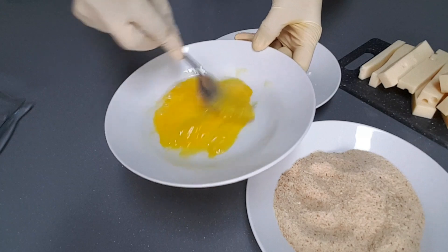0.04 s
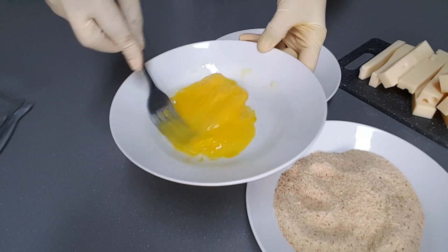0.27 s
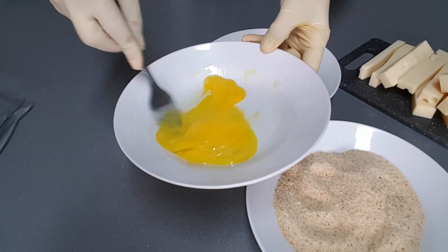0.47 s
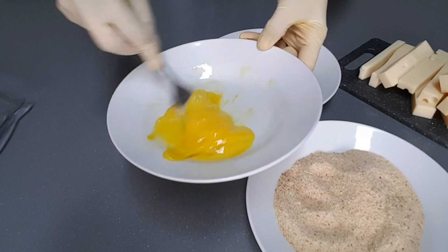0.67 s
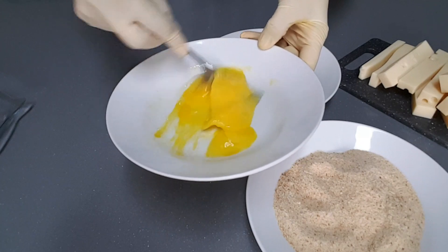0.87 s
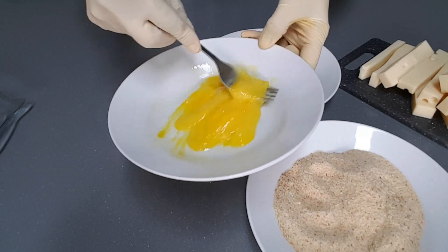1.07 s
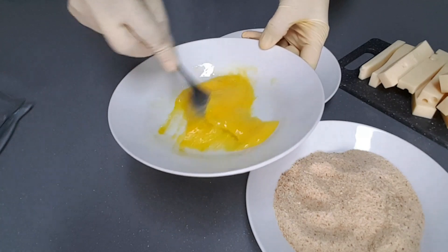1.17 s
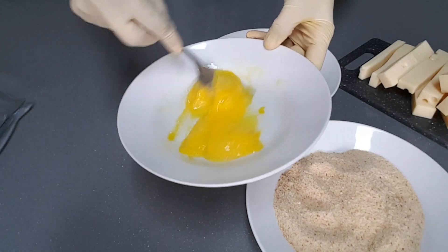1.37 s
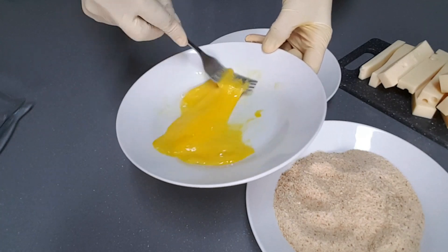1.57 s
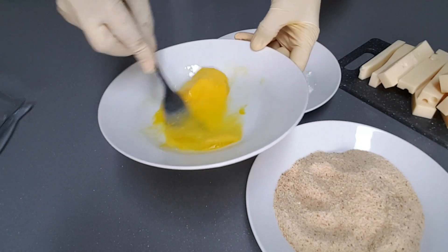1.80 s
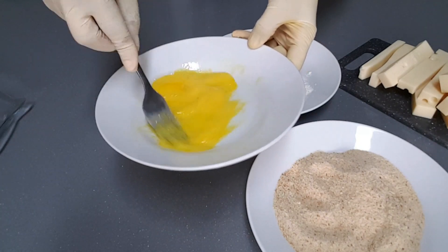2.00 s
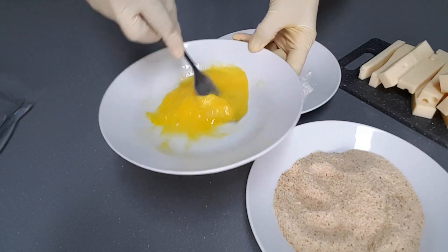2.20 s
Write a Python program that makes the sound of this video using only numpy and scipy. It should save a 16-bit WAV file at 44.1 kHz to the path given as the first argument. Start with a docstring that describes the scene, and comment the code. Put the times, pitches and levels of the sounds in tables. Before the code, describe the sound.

A metal fork beats raw egg in a hand-held ceramic plate for just over two seconds, about six strokes each second. Soft wet swishes, tiny bubbles and plops fill between sharp, uneven tine ticks, strong near 0.39 and 0.57. Bright short-ringing clinks hit at 0.64, 0.76 and 1.84. Faint low handling thuds and steady hiss lie beneath; close stereo pickup, small kitchen reflections.

```python
"""A faint wet swish opens over room hiss, then a steel fork beats a raw egg in a hand-held ceramic plate,
about six strokes a second, in a small kitchen. Drags are grainy, patchy noise; bubbles and plops are
rising damped tones. Tines tick as short coloured bursts; a few blows on bare ceramic add ringing modes.
A low murmur and dull jolts come from the plate in the hand; a decaying noise tail is the room."""
import sys
import numpy as np
from scipy import signal
from scipy.fft import rfft, irfft, next_fast_len
from scipy.io import wavfile
from scipy.ndimage import uniform_filter1d

SR = 44100
rng = np.random.default_rng(int(sys.argv[2]) if len(sys.argv) > 2 else 0)


def transcribe(u):
    """Save the signal u as a 16-bit wav file named by the first command-line argument.

    u: samples, shape (n,) or (channels, n), limited to [-1, 1]; the rate is SR.
    q: integer samples, one column per channel.
    """
    v = np.clip(np.atleast_2d(u).T, -1, 1)
    q = np.round(v * 32767).astype(np.int16)
    wavfile.write(sys.argv[1], SR, q)


N = 99225

# Steady room hiss: colour [f/Hz, level/dB]
HISS_COLOUR = [(25, -56), (60, -68), (140, -59.5), (300, -70.5), (600, -69.5), (1500, -62), (3000, -61.5),
               (5000, -67.5), (8400, -92), (10000, -81), (14000, -90)]
HISS_DB = -59

# Low murmur of the held plate: level over time [t/s, level/dB]
MURMUR_LEVEL = [(0, -71), (.08, -59), (.2, -68.5), (.32, -61), (.56, -60), (0.702, -63), (1.2, -68.5),
                (1.8, -65.5), (2.0, -82), (2.25, -71.5)]
# Murmur colour [f/Hz, level/dB]
MURMUR_COLOUR = [(30, -16), (80, -3), (140, 5.5), (210, -2.5), (310, 5), (450, -9), (900, -12), (3000, -61)]

# Fork dragging through egg [middle t/s, half length/s, level/dB]
SWISHES = [(.005, 0.023, -54), (0.086, 0.036, -48.5), (0.249, 0.024, -45.5), (0.294, 0.0062, -44.5),
           (0.446, 0.026, -41.5), (0.619, 0.04, -45.5), (0.795, .03, -52), (0.974, 0.038, -40.5),
           (1.158, 0.025, -41), (1.328, 0.022, -38.5), (1.483, 0.026, -39.5), (1.645, 0.031, -47),
           (1.821, 0.019, -45.5), (1.984, 0.063, -41.5), (2.17, 0.022, -41)]
# Colour of the egg's swish [f/Hz, level/dB]
SWISH_COLOUR = [(100, -20), (300, -15.5), (700, -30), (1400, 3), (2600, -0.5), (4200, -3), (6500, -0.5),
                (8400, 4), (9600, -6), (12500, -1), (14400, -8), (16000, -3)]
GRAIN_DEPTH_DB, GRAINS_PER_S = 3, 500
PATCH_DEPTH_DB = 4

# Tiny bubbles: middle level before a doubling in amplitude, middle pitch, pitch range either way as a natural
# log
BUBBLE_DB, BUBBLE_HZ, BUBBLE_LOG_RANGE = -48, 1837, 0.7
BUBBLE_COUNT, BUBBLE_T60_S = 260, 0.009
POCKET_ATTACK_S, PITCH_RISE_PER_S = 0.0011, 3.3  # shared by bubbles and plops

# Room decay by pitch [f/Hz, t60/s]
ROOM_DECAY = [(150, 0.1), (600, 0.84), (2000, 0.51), (6000, 0.79), (14000, 0.39)]
# Room colour [f/Hz, level/dB]
ROOM_COLOUR = [(100, -3), (350, -1.5), (600, 5.5), (1000, -1.5), (3000, 4), (8000, 1.5), (14000, 3)]
# Left-right likeness of the room [f/Hz, correlation]
ROOM_ALIKE = [(100, -.2), (300, 0.84), (700, 0.58), (1500, 0.22), (3000, 0.13), (6000, -0.031)]
TICK_ROOM_DB, CLINK_ROOM_DB, EGG_ROOM_DB = -7, -3, -5  # sends into the room
EARLY_DB, EARLY_T60_S, ROOM_FADE_IN_S = 12, 0.059, 0.0057

# Tines on the wet plate [t/s, level/dB, bass/dB, treble/dB, low ring/dB, high ring/dB,
# burst-shape t60/s, left over right/dB]
TICKS = [(.0245, -34.5, 11, -2, 0, -13, 0.016, 2), (.0432, -30, 4.5, 1.5, -5, -1, 0.0058, 8),
         (0.2086, -25.5, 3, -0.5, 5, 5.5, 0.013, 3), (0.241, -36, 10, -5, -24, -6, 0.0065, 2),
         (0.3875, -15, -1.5, -6, -12.5, -20, 0.06, 2), (0.4599, -30.5, 5, -1, -5, -7, 0.019, 10),
         (0.567, -16.5, 1.5, 0.5, -12, -4.5, 0.015, -1), (.753, -20, 3.5, -1, -13, -2.5, 0.018, 4),
         (0.8337, -25.5, 10, 3, 3, 1.5, 0.017, 3), (0.9318, -20.5, 9.5, 3, 13.5, 4.5, 0.0065, -1.5),
         (1.0134, -32.5, -26, 4, -12, -4, 0.017, -4), (1.109, -25, 5, 7.5, 1.5, 0.5, 0.019, -0.5),
         (1.1654, -31.5, 5, 3, 0, -10, 0.051, -1), (1.268, -19, 1.5, 4.5, 15.5, -15, 0.02, 0.5),
         (1.3106, -39.5, 19, 8, -5, -2, 0.0037, -1), (1.4346, -23.5, 4, -7, 5.5, 7, 0.011, 5.5),
         (1.5944, -22.5, 5, 3.5, -4, -2.5, 0.025, 3), (1.773, -27.5, 2.5, -0.5, 11, -7.5, 0.0053, -2),
         (1.9524, -17.5, 1, -8.5, -5, -20, 0.0093, -2), (2.054, -26.5, -4, -53, 2.5, 0, 0.016, 3),
         (2.0997, -30, 2, -2.5, 4, -9.5, 0.024, 1), (2.227, -41.5, 13, 3, 8, -4, 0.016, -1)]
# Tick colour [f/Hz, level/dB]
TICK_COLOUR = [(30, -45.5), (200, -14), (750, -30), (1300, -13.5), (1800, -9), (2520, 1.5), (2900, -3.5),
               (3500, -4.5), (4300, -13), (5300, -3.5), (5850, -8.5), (6500, 2.5), (7400, -6), (8350, 12),
               (9300, -14), (9900, -15.5), (10750, -2.5), (11500, -10.5), (12600, 1.5), (14400, -4.5),
               (16000, -19)]
TICK_ATTACK_S, TICK_HOLD_S = 0.0006, 0.0022
PING_HZ, LOW_RING_HZ, HIGH_RING_HZ = 2540, 5180, 8400
PING_DB, PING_WIDTH_HZ, RING_WIDTH_HZ = 5, 150, 380
BASS_HZ, TREBLE_HZ = 2310, 8940  # shelf corners

# Air pockets closing in the egg [t/s, level before a doubling in amplitude/dB, starting f/Hz]
PLOPS = [(0.0444, -34.5, 2220), (0.077, -43, 1254), (.081, -39.5, 1924), (.1615, -47, 3460),
         (0.242, -47, 1470), (.272, -35.5, 1348), (.2745, -38.5, 1700), (.425, -32, 1900), (.43, -41, 855),
         (.462, -38, 1580), (0.5257, -35, 1336), (.549, -41, 1400), (.578, -44, 1880), (.603, -36, 1510),
         (0.841, -26, 2230), (1.166, -44, 1440), (1.182, -35.5, 1277), (1.219, -41.5, 2090),
         (1.243, -39.5, 1516), (1.311, -35.5, 1995), (1.332, -42, 1530), (1.335, -32.5, 1192),
         (1.43, -41.5, 1436), (1.472, -42, 1430), (1.494, -41.5, 1860), (1.6512, -31.5, 1477),
         (1.654, -31.5, 1900), (1.721, -46.5, 1630), (1.731, -47, 1105), (1.7735, -33.5, 1380),
         (1.774, -34, 2120), (2.052, -37.5, 1496), (2.2262, -39, 1850)]
PLOP_T60_S = 0.026
SQUELCH_DB, SQUELCH_T60_S, SQUELCH_OCTAVES = -5, 0.025, 0.22  # wet noise around each plop

# Fork on bare ceramic [t/s, level/dB, bass/dB, treble/dB, ring trim/dB]
CLINKS = [(0.3904, -36, -13, 4, -1.5), (.643, -11.5, 0, 10.5, -7.5), (0.7594, -22.5, -1.5, 8, -9.5),
          (.833, -26.5, 7.5, 1, -6.5), (0.8407, -35.5, -8, -16, -13), (1.8418, -15, 4, 12, -5),
          (1.8499, -31, 3, 29.5, 1)]
# Colour of the crack [f/Hz, level/dB]
CRACK_COLOUR = [(30, -28.5), (130, -1.5), (330, -16.5), (560, -2), (1100, 6), (1700, 6.5), (2500, 2.5),
                (3600, 7), (4800, 1.5), (6800, 6), (8600, 2), (9500, -7.5), (10300, -1.5), (11200, -15.5),
                (12200, -7), (14400, -13.5), (16000, -84)]
# Ringing of plate and fork [f/Hz, level before ring trim/dB, t60/s]
RING_MODES = [(550, -13, .05), (1345, -8, .07), (1715, -4, .07), (1987, -11, .07), (3065, -14, .08),
              (3500, -6, .08), (4150, -6, .08), (5399, -7, .14), (5850, -17, .14), (6753, -10, .13),
              (7505, -12, .22), (8480, -13, .1), (8653, -12, .14), (10200, -16, .12), (12185, -14, .15),
              (14410, -20, .1)]
CRACK_HOLD_S, CRACK_SHAPE_T60_S = 0.00087, 0.029
RING_DB, RING_SCATTER_DB, RING_JITTER_HZ = -1, 1.5, 3
RING_TIME_SPREAD_S = 0.00002  # random left and right offset of each mode

# Jolts of the held plate [t/s, level/dB]
JOLTS = [(0.647, -46), (0.9327, -33), (1.269, -45), (1.4342, -46.5), (1.5944, -44), (1.8427, -36)]
# Jolt colour [f/Hz, level/dB]
JOLT_COLOUR = [(30, -20), (70, -5), (130, -1), (250, -15), (420, 0.5), (700, -6), (1100, -6.5), (2500, -36)]
JOLT_SHAPE_T60_S = 0.012

# Left-right likeness of the direct noises and impacts [f/Hz, correlation]
DIRECT_ALIKE = [(40, 0.79), (90, -0.12), (160, 0.18), (300, -0.019), (600, 0.66), (1500, 0.79),
                (3000, 0.33), (6000, 0.024), (12000, 0.49)]
# Stereo lean of the direct sound [f/Hz, left over right/dB]
STEREO_LEAN = [(150, -2.5), (600, -2.5), (1400, -1.5), (3000, -2), (5200, -7), (7800, -2.5), (9000, 14),
               (10700, 8), (12800, 5.5), (14500, -2.5)]
LEFT_LEAD_S = 0.00003
CEILING, TOP_HZ = 0.9, 14900  # peak limit in full scale, top of the band


def amp(db):
    """Decibels to amplitude."""
    return 10 ** (np.asarray(db) / 20)


def unit(x):
    """Scale to an rms of 1."""
    return x / np.sqrt(np.mean(x ** 2) + 1e-20)


def along(points, hz):
    """Read a curve of (Hz, value) points on a log frequency axis."""
    f, value = np.transpose(points)
    return np.interp(np.log(hz + 1), np.log(f + 1), value)


def seconds(count):
    """Time of each sample."""
    return np.arange(count) / SR


def add(track, s, sound):
    """Mix a sound in at time s."""
    start = max(round(s * SR), 0)
    part = sound[..., :max(N - start, 0)]
    track[..., start:start + part.shape[-1]] += part


def filtered(x, response):
    """Apply a complex frequency response."""
    n = x.shape[-1]
    m = next_fast_len(n + 8192)
    hz = np.fft.rfftfreq(m, 1 / SR)
    return irfft(rfft(x, m) * response(hz), m)[..., :n]


def spread(pair, alike=DIRECT_ALIKE):
    """Blend two unrelated signals as mid and side to give left and right a set likeness."""
    def weights(hz):
        turn = np.arccos(np.clip(along(alike, hz), -1, 1)) / 2
        return np.array([np.cos(turn), np.sin(turn)])

    mid, side = filtered(pair, weights)
    return np.array([mid + side, mid - side])


def noise(colour):
    """Two unrelated coloured noises, rms 1 overall."""
    return unit(filtered(rng.standard_normal((2, N)), lambda hz: amp(along(colour, hz))))


def contact(envelope, colour, extra_db):
    """A burst of micro-impacts: flat-spectrum noise under an envelope, through a causal colour."""
    n = len(envelope)
    hz = np.fft.rfftfreq(n, 1 / SR)
    burst = envelope * rng.standard_normal((2, n))
    for _ in range(2):
        flat = irfft(np.exp(1j * np.angle(rfft(burst))), n)
        burst = flat * np.sqrt(envelope)
    burst = unit(burst) * np.sqrt(np.mean(envelope ** 2))
    # Folding the cepstrum makes the colour minimum-phase, so nothing rings before the hit
    gain = unit(amp(along(colour, hz))) * amp(extra_db(hz))
    cepstrum = irfft(np.log(gain + 1e-6))
    fold = 1 + np.sign(n // 2 - np.arange(n))
    fold[0] = 1
    return spread(irfft(rfft(burst) * np.exp(rfft(cepstrum * fold)), n))


def shelves(hz, bass_db, treble_db):
    """Bass and treble lift in dB."""
    bass = bass_db / (1 + (hz / BASS_HZ) ** 4)
    treble = treble_db * (1 - 1 / (1 + (hz / TREBLE_HZ) ** 8))
    return bass + treble


def hiss():
    """Room floor: steady coloured noise."""
    return amp(HISS_DB) * spread(noise(HISS_COLOUR))


def murmur():
    """The plate in the hand: faint low noise whose level wanders."""
    level = np.interp(seconds(N), *np.transpose(MURMUR_LEVEL))
    return amp(level) * spread(noise(MURMUR_COLOUR))


def patchy(x):
    """Mottle the colour in random patches about 860 Hz wide and 12 ms long."""
    z = signal.stft(x, nperseg=256)[2]
    field = rng.standard_normal(z.shape[1:])
    field = uniform_filter1d(field, size=5, axis=0)
    field = uniform_filter1d(field, size=4, axis=1)
    mottled = z * amp(PATCH_DEPTH_DB * unit(field))
    return unit(signal.istft(mottled, nperseg=256)[1][:, :N])


def swishes():
    """The fork drags through egg: bell-shaped swells of noise, roughened by random grains of level."""
    t = seconds(N)
    drag = sum(amp(db) * np.exp(-.5 * ((t - s) / half) ** 2) for s, half, db in SWISHES)
    knots = rng.standard_normal(N)
    roughness = np.interp(t * GRAINS_PER_S, np.arange(N), knots)
    grain = unit(amp(GRAIN_DEPTH_DB * roughness))
    return drag * grain * patchy(spread(noise(SWISH_COLOUR)))


def bubble(hz, t60):
    """A damped tone that rises as the air pocket shrinks."""
    t = seconds(2500)
    envelope = (1 - np.exp(-t / POCKET_ATTACK_S)) * amp(-60 * t / t60)
    return envelope * np.sin(2 * np.pi * hz * (t + PITCH_RISE_PER_S * t * t / 2))


def bubbles():
    """Tiny air pockets scattered around every drag, with random level and pitch."""
    out = np.zeros(N)
    for k, (when, size, pitch) in enumerate(rng.uniform(-1, 1, (BUBBLE_COUNT, 3))):
        s, half, _ = SWISHES[k % len(SWISHES)]
        hz = BUBBLE_HZ * np.exp(BUBBLE_LOG_RANGE * pitch)
        level = 2 * amp(BUBBLE_DB + 6 * size)
        add(out, s + 2 * half * when, level * bubble(hz, BUBBLE_T60_S))
    return out


def kitchen(x):
    """Small room: a strong, quickly fading early part, then a diffuse tail, both of decaying noise."""
    hz, t, z = signal.stft(rng.standard_normal((2, SR * 3 // 4)), SR, nperseg=256)
    late = amp(-60 * t / along(ROOM_DECAY, hz)[:, None])
    early = amp(EARLY_DB - 60 * t / EARLY_T60_S)
    colour = amp(along(ROOM_COLOUR, hz))[:, None]
    tail = signal.istft(z * (late + early) * colour, SR, nperseg=256)[1]
    tail = tail * np.clip(seconds(tail.shape[1]) / ROOM_FADE_IN_S, 0, 1) ** 2
    tail = tail / np.linalg.norm(tail[0])
    return spread(signal.fftconvolve(x, tail, axes=1)[:, :N], ROOM_ALIKE)


def ticks():
    """Tines chatter on the plate for about two milliseconds; the egg damps their rings to colour peaks."""
    out, t = np.zeros((2, N)), seconds(4096)

    def peak(hz, centre, width=RING_WIDTH_HZ):
        return 1 / (1 + ((hz - centre) / width) ** 2)

    for s, db, bass_db, treble_db, low_db, high_db, t60, pan_db in TICKS:
        attack = 1 - np.exp(-t / TICK_ATTACK_S)
        envelope = attack * amp(-60 * np.maximum(t - TICK_HOLD_S, 0) / t60)

        def tone(hz):
            ping = PING_DB * peak(hz, PING_HZ, PING_WIDTH_HZ)
            rings = low_db * peak(hz, LOW_RING_HZ) + high_db * peak(hz, HIGH_RING_HZ)
            return shelves(hz, bass_db, treble_db) + ping + rings

        level = amp([[db + pan_db / 2], [db - pan_db / 2]])
        add(out, s, level * contact(envelope, TICK_COLOUR, tone))
    return out


def plop(hz):
    """An air pocket closes: a short tone in a squelch of noise around its starting pitch."""
    tone = bubble(hz, PLOP_T60_S)
    t = seconds(len(tone))
    band = lambda f: 1 / (1 + (np.log2((f + 1) / hz) / SQUELCH_OCTAVES) ** 2)
    squelch = unit(filtered(rng.standard_normal(len(t)), band))
    squelch = squelch * amp(SQUELCH_DB - 60 * t / SQUELCH_T60_S)
    return tone + squelch * (1 - np.exp(-t / POCKET_ATTACK_S))


def plops():
    """Larger air pockets close in the egg, each at its own pitch."""
    out = np.zeros(N)
    for s, db, hz in PLOPS:
        add(out, s, 2 * amp(db) * plop(hz))
    return out


def clinks():
    """A hard blow on bare ceramic: a noisy crack, and damped modes of slightly unsteady pitch."""
    out, t = np.zeros((2, N)), seconds(16384)
    hz, level, t60 = np.transpose(RING_MODES)[:, :, None]
    envelope = amp(-60 * np.maximum(t - CRACK_HOLD_S, 0) / CRACK_SHAPE_T60_S)
    for s, db, bass_db, treble_db, ring_db in CLINKS:
        crack = contact(envelope, CRACK_COLOUR, lambda f: shelves(f, bass_db, treble_db))
        # A random walk in phase widens each mode by the jitter
        steps = rng.standard_normal((len(hz), len(t)))
        drift = np.cumsum(steps, axis=1) * np.sqrt(2 * np.pi * RING_JITTER_HZ / SR)
        offset = RING_TIME_SPREAD_S * rng.standard_normal((2, len(hz), 1))
        phase = 2 * np.pi * hz * offset + drift
        scatter = RING_SCATTER_DB * rng.standard_normal(hz.shape)
        modes = amp(level + scatter - 60 * t / t60) * np.sin(2 * np.pi * hz * t + phase)
        ring = modes.sum(axis=1)
        add(out, s, amp(db) * (crack + amp(RING_DB + ring_db) * ring))
    return out


def jolts():
    """The held plate is jolted: dull, short bursts of low-coloured noise."""
    out = np.zeros((2, N))
    push = amp(-60 * seconds(4096) / JOLT_SHAPE_T60_S)
    for s, db in JOLTS:
        add(out, s, amp(db) * contact(push, JOLT_COLOUR, np.zeros_like))
    return out


def lean(hz):
    """Stereo placing: left-right balance by pitch, with the left slightly early."""
    balance = amp(along(STEREO_LEAN, hz) * [[.5], [-.5]])
    lead = np.exp(1j * np.pi * hz * LEFT_LEAD_S * np.array([[1], [-1]]))
    return balance * lead


def scene():
    """Lean the direct sounds, then add the room's answer to egg, tines and plate."""
    egg = swishes() + bubbles() + plops()
    tines, plate = ticks(), clinks()
    send = amp(TICK_ROOM_DB) * tines + amp(CLINK_ROOM_DB) * plate + amp(EGG_ROOM_DB) * egg
    direct = hiss() + murmur() + egg + tines + plate + jolts()
    return filtered(direct, lean) + kitchen(send)


def record(dry):
    """Round off the highest peaks, then cut steeply above the top of the band."""
    rounded = dry / (1 + np.abs(dry / CEILING) ** 6) ** (1 / 6)
    return filtered(rounded, lambda hz: 1 / np.sqrt(1 + (hz / TOP_HZ) ** 120))


dry = scene()
out = record(dry)
transcribe(out)
```